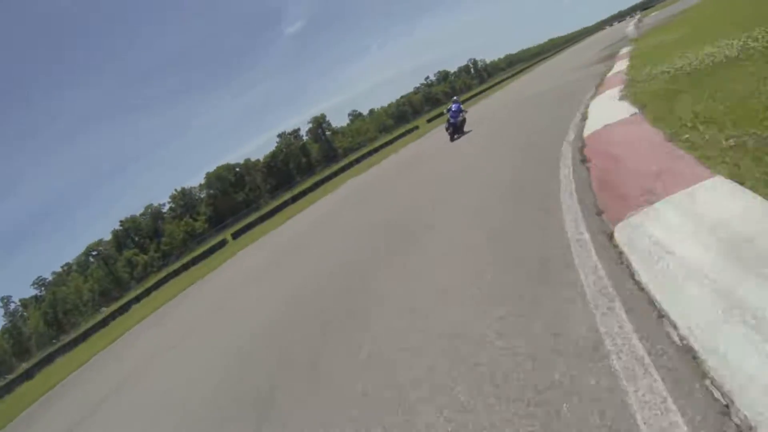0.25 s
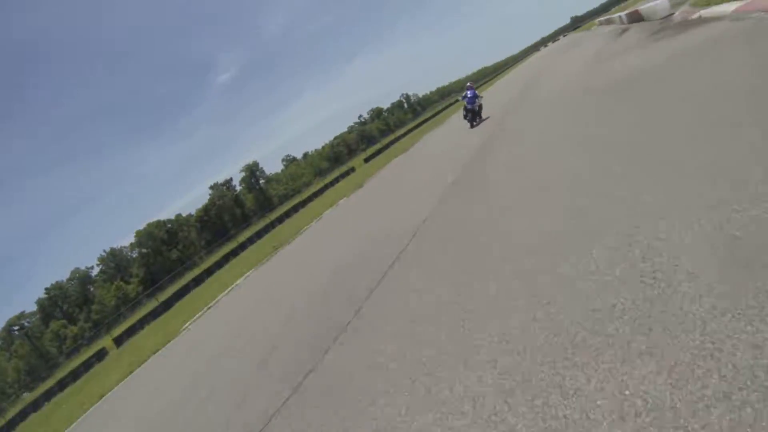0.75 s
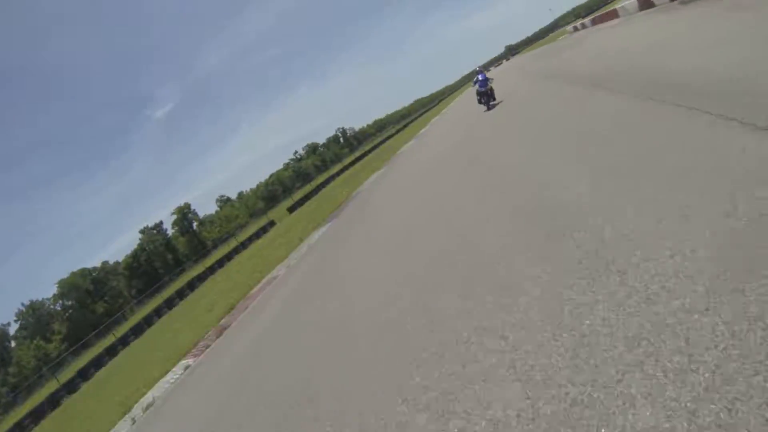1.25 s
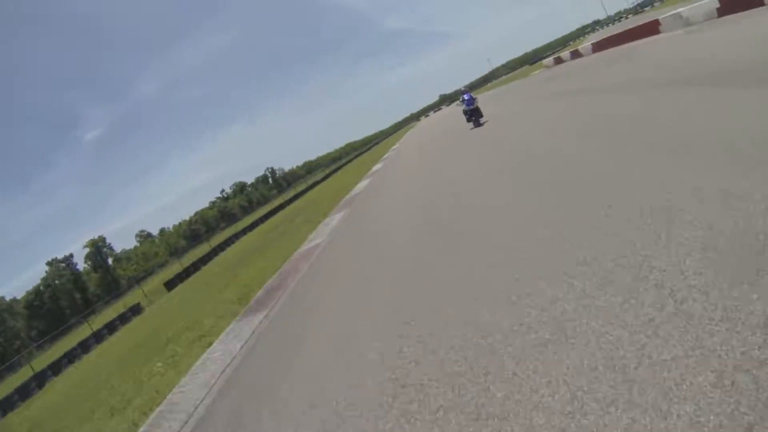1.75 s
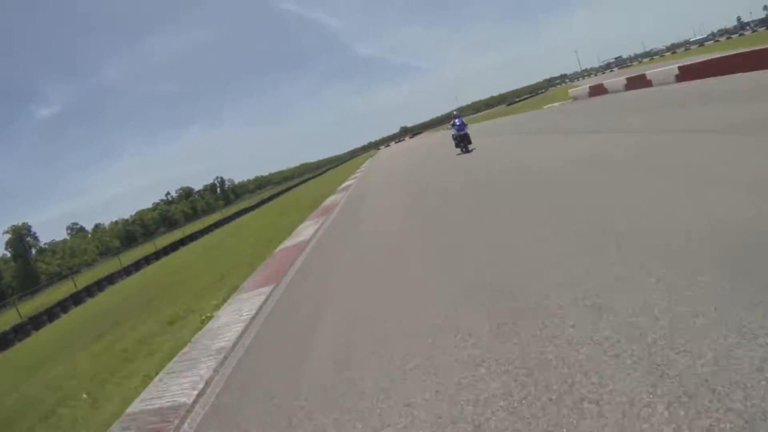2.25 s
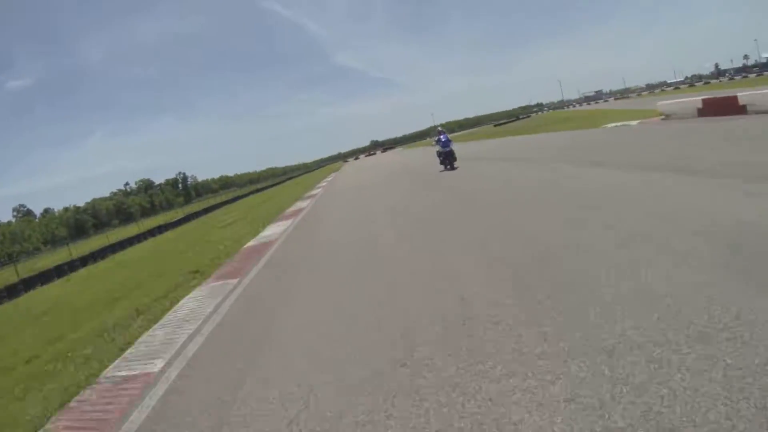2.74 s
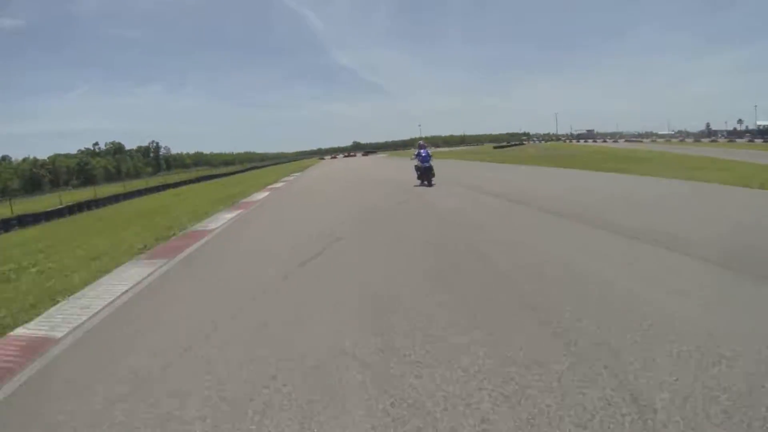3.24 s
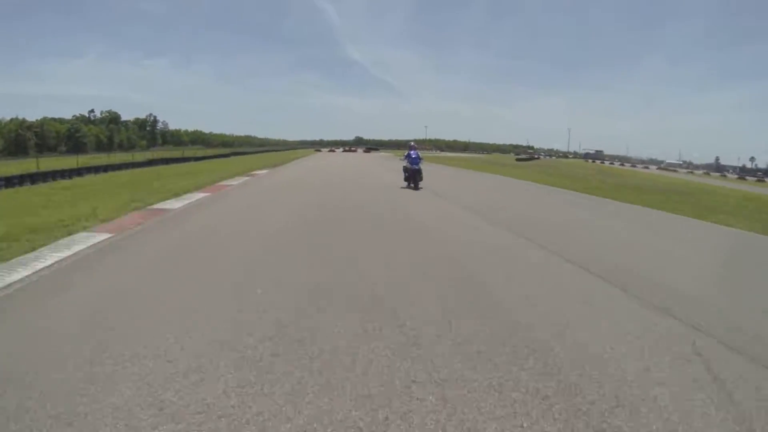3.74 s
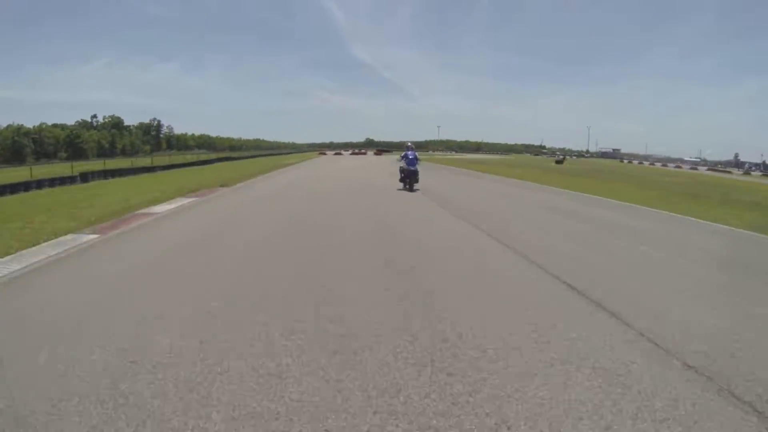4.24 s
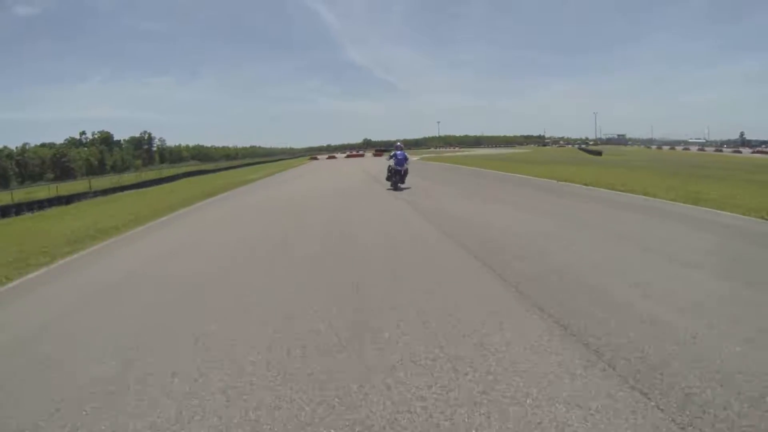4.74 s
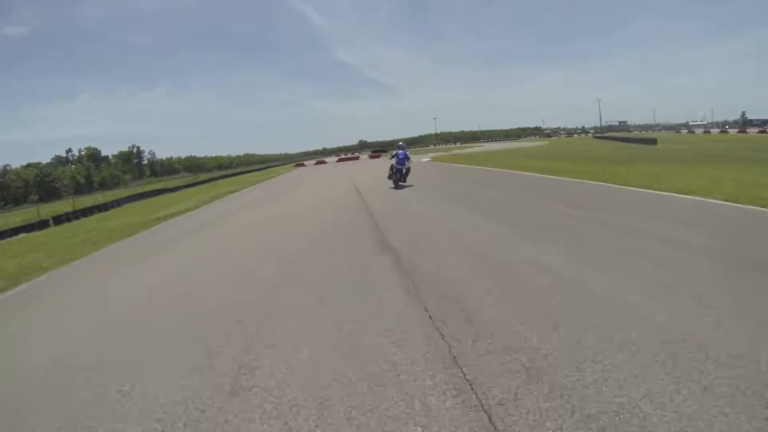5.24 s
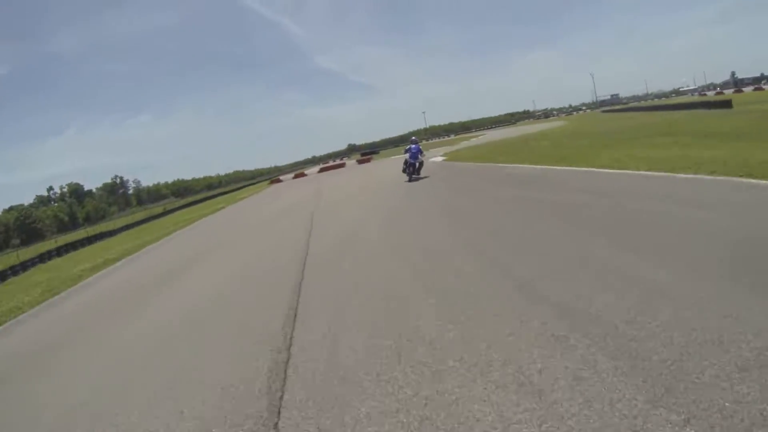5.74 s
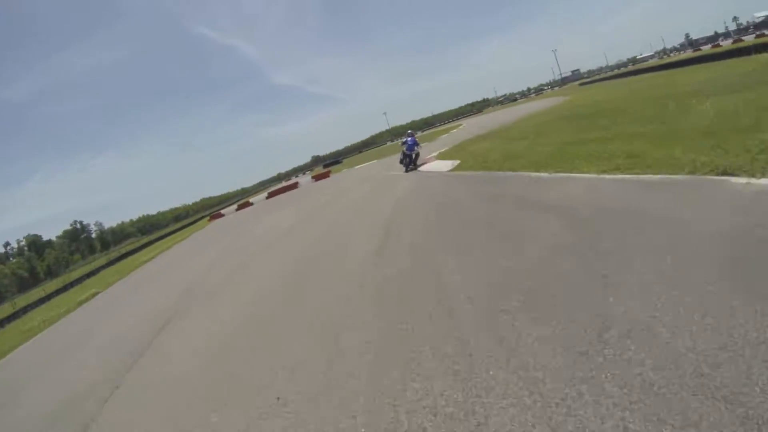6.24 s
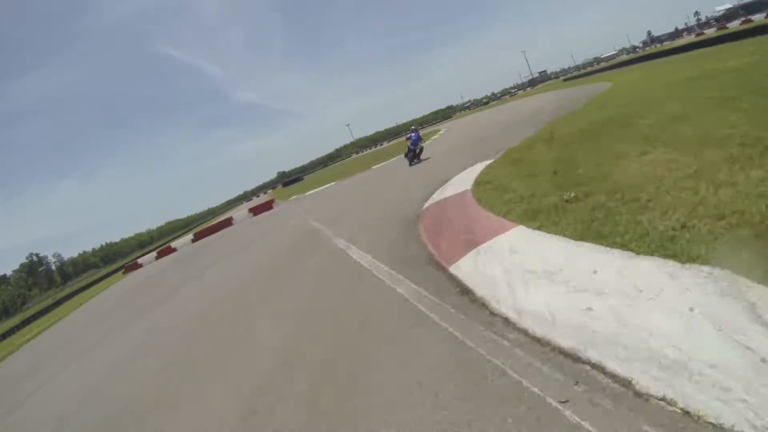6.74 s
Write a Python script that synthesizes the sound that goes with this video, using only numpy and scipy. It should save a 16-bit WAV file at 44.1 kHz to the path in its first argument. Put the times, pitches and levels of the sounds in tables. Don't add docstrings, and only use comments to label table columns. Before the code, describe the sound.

From inside a sealed plastic case mounted on a motorcycle, a low engine drone runs without a break, near 53 turns a second at first, with a harsh buzz above it. From 0.4 s short clusters of dry plastic knocks and bounces chatter over it. Around 1.2 to 1.4 s the mount sways harder and the sound throbs deeply, again near 2 s. The pitch climbs to its highest around 3.6 s as the engine pulls hard, with fewer knocks between 2.5 and 3.3 s. A dense run of ticks comes at 3.8 to 4 s, then a smoother, steady, rattling hum until about 4.8 s. After 5 s the engine eases slightly lower, swaying resumes near 5.4 s, and knocking bouts crowd together, with rattle strongest around 6.3 s, continuing to the cut at 7 s. Muffled, lightly gusting wind stays behind everything.

```python
import sys
import numpy as np
from scipy import signal
from scipy.io import wavfile
from scipy.ndimage import uniform_filter1d

SR = 44100
rng = np.random.default_rng(int(sys.argv[2]) if len(sys.argv) > 2 else 0)


def unload_wav(signal):
    wavfile.write(
        sys.argv[1],
        SR,
        np.round(np.clip(np.atleast_2d(signal).T, -1, 1) * 32767).astype(np.int16),
    )


def boost(x):
    u = np.asarray(x, float) / 20
    return 10 ** u


N = 308259
T = np.arange(N) / SR

# time_s, crank_hz
CRANK_SPEED = [(0.0, 52.58), (0.519, 53.8), (1.03, 56.84), (1.22, 56.71), (1.958, 58.71), (2.764, 61.53),
               (3.628, 62.33), (3.915, 59.66), (3.99, 61.43), (4.593, 59.72), (5.128, 60.08), (5.22, 58.89),
               (5.573, 58.72), (5.877, 57.35), (6.07, 57.97), (6.55, 58.78), (6.693, 57.58), (7.0, 59.31)]
# time_s, load
ENGINE_LOAD = [(0, 0), (.5, 0), (.8, 1), (1.2, 1), (1.5, 2), (2.05, 2), (2.25, 3), (2.7, 3.2), (3.2, 4),
               (3.7, 3.8), (3.9, 2.6), (4.1, 3), (5.12, 3), (5.25, 5), (7, 5)]
# order, level_db at load 0, 1, 2, 3, 4, 5
LOW_ORDERS = [(1, -30.5, -35, -35.5, -36, -37, -34), (2, -40.5, -41.5, -40.5, -38.5, -39, -40),
              (3, -34, -39, -32.5, -28.5, -27.5, -32.5), (4, -36.5, -42.5, -42, -41, -38, -48),
              (5, -43.5, -50.5, -44.5, -50, -49.5, -47.5)]
ORDER_PEAK_TURNS = [.33, -.095, -.085, .085, .03]
# order, level_db at load 0, 1, 2, 3, 4, 5
UPPER_ORDERS = [(5.97, -59.5, -62, -52, -45.5, -44, -48), (7.018, -46.5, -43.5, -38.5, -40, -44, -38),
                (8.016, -51, -44.5, -47.5, -39, -37, -44), (9.06, -43, -54, -52.5, -71.5, -59.5, -45.5),
                (9.95, -46, -56, -48.5, -45, -53, -51), (11.03, -47.5, -56, -60, -52, -58, -62.5),
                (11.94, -54.5, -61.5, -69, -68, -73, -58.5), (14, -55, -54.5, -55.5, -65, -66.5, -57),
                (15, -71, -69, -70.5, -59.5, -67, -58.5), (16, -68, -72, -73, -54.5, -66.5, -66),
                (17, -68, -73.5, -70.5, -57, -50.5, -45), (18, -64, -67, -68, -52, -73.5, -67.5),
                (19, -68, -56.5, -60.5, -58.5, -64.5, -60), (20, -82, -62, -58.5, -55, -64.5, -48.5),
                (21.05, -75, -62, -58, -54.5, -64.5, -57)]
# time_s, sway_db
SWAY_LEVEL = [(0.0, -54.5), (0.41, -30), (0.47, -41), (1.24, -27.5), (1.28, -21.5), (1.38, -23.5),
              (1.65, -34.5), (1.67, -33), (2.06, -27.5), (2.24, -41), (4.83, -41.5), (5.1, -51),
              (5.41, -29.5), (5.7, -32.5), (5.74, -28), (6.19, -39), (6.76, -35), (6.99, -37)]
# time_s, slack_db
CASE_SLACK = [(0, -1.5), (.8, -3), (1.5, 0), (2.1, -1), (2.3, -0.5), (3.2, -4), (3.9, -0.5), (4.02, -6),
              (4.2, 2), (5.3, 2), (5.41, -3.5), (5.5, 1), (6.3, 6), (6.52, 1), (6.65, 3.5), (6.8, 3.5),
              (6.99, 0)]
# mode_hz, width_hz, level_db
BRACKET_MODES = [(227.3, 54.5, 1.5), (204, 170, 3)]
# mode_hz, width_hz, level_db
CASE_MODES = [(414, 8.7, 1.5), (519.8, 48, 6.5), (608, 14, -5), (636, 13, -1.5)]
# mode_hz, width_hz, level_db
RATTLE_MODES = [(806, 170, -12.5), (825, 38.4, -5.5), (950, 228, 4), (1042, 120.5, 6), (1242, 51, -6.5),
                (1487.5, 50, -7.5), (1655, 54, -8), (2090, 280, -2.5)]
# mode_hz, width_hz, level_db
TICK_MODES = [(2070, 300, 5), (2987, 210, 4.5), (3770, 460, 0), (4470, 286, -0.5), (4950, 320, -2.5),
              (6410, 760, 0.5), (8830, 1330, 0.5), (9680, 770, 0), (12900, 1100, -8)]
# first_s, last_s, peak_db, bounce_db
EVERY_TURN_BOUTS = [(.47, .507, -53, -9), (.563, .6, -54, -5), (.728, .746, -56, -2), (.818, .837, -54, -3),
                    (1.296, 1.313, -56, -9), (1.575, 1.592, -53, -9), (1.644, 1.748, -52, -4),
                    (1.868, 1.919, -54, -1), (2.374, 2.391, -54, -1), (2.457, 2.474, -54, -4),
                    (3.367, 3.399, -56, -9), (3.431, 3.463, -53, -3), (3.77, 3.986, -53, -2),
                    (4.897, 4.914, -52, -5), (5.08, 5.147, -52, -3), (5.215, 5.299, -53, -9),
                    (5.333, 5.384, -54, -2), (5.452, 5.571, -52, -6), (5.606, 5.708, -52, -5),
                    (5.829, 5.846, -51, -12), (6.038, 6.089, -53, -12), (6.175, 6.278, -51, -12),
                    (6.313, 6.501, -50, -11), (6.759, 6.81, -52, -9), (6.845, 6.862, -52, -12),
                    (6.93, 6.981, -53, -5)]
# first_s, last_s, peak_db, bounce_db
SECOND_TURN_BOUTS = [(.414, .414, -54, -9), (.637, .673, -54, -4), (.89, .89, -57, -4),
                     (.996, 1.032, -52, -9), (1.137, 1.137, -52, -7), (1.349, 1.349, -53, -4),
                     (1.782, 1.817, -52, -6), (1.953, 2.161, -56, -4), (2.291, 2.324, -55, -3),
                     (2.424, 2.424, -56, -9), (2.638, 2.638, -59, 0), (2.687, 2.687, -57, 3),
                     (2.931, 2.931, -55, -9), (3.012, 3.012, -54, -2), (4.05, 4.116, -57, -12),
                     (4.446, 4.446, -58, -9), (4.83, 4.864, -54, -9), (4.964, 4.964, -52, -9),
                     (5.031, 5.031, -58, -9), (5.181, 5.181, -56, -9), (5.743, 5.743, -55, -1),
                     (5.794, 5.794, -60, -9), (5.882, 5.952, -55, -12), (6.124, 6.124, -54, -12),
                     (6.603, 6.603, -51, -6)]
THIRD_CONTACT_DB = [-3, -3, -2, -11, -11, -3.5]
# freq_hz, level_db_per_hz
WIND_SPECTRUM = [(20, 4.5), (40, -11), (75, -24.5), (250, -14.5), (750, -25.5), (4200, -54.5), (5500, -71),
                 (13000, -80.5)]

BRACKET_DB = [-37.5, -34, -38.5, -42.5, -51.5, -38]
SWAY_HZ, BOUNCE_S = 29.3, 0.0045
THUMP_TURNS, THUMP_JITTER_S = 0.75, 0.0001
KNOCK_TURNS, KNOCK_JITTER_S = 0.95, 0.00028
KNOCK_SPREAD_DB, BOUNCE_SPREAD_DB = 2.2, 3.5
MISSED_DB = -8.5
CASE_LEAD_SAMPLES = 125


def engine(turns):
    hum = np.zeros(N)
    for order, *levels_db in LOW_ORDERS:
        level = boost(by_load(levels_db) + drift(8.3))
        angle = turns - ORDER_PEAK_TURNS[order - 1]
        hum += level * np.sqrt(2) * np.cos(2 * np.pi * order * angle)
    return hum


def buzz(turns, tilt):
    lines = np.zeros(N)
    for order, *levels_db in UPPER_ORDERS:
        level = boost(by_load(levels_db) + 1.2 * drift(20))
        phase_rad = 1.45 + 0.25 * drift(4)
        lines += level * np.sqrt(2) * np.cos(2 * np.pi * round(order) * turns + phase_rad)
    return lines * (1 + 0.36 * tilt)


def mount(turns):
    hard = knocks(turns)
    bout = busy(hard)
    sway_db = curves(SWAY_LEVEL)[0]
    slack_db = curves(CASE_SLACK)[0] + 7.5 * bout
    early = np.roll(hard, -CASE_LEAD_SAMPLES)
    swaying = sway(hard)
    tilt = np.clip(swaying * boost(sway_db + 33), -1, 1)
    faint = boost(-76) * thumps(turns - 0.2, tilt, spread_db=4.5, lean=0.5, bounce=0.9)

    out = boost(sway_db) * swaying
    out += bracket(turns, tilt, hard, sway_db, bout)
    out += buzz(turns, tilt)
    out += case(early, bout)
    out += rattle(turns, tilt, early, slack_db)
    out += boost(1.8) * ticks(hard + faint)
    return out + chatter(turns, tilt, hard, slack_db)


def sway(hard):
    push = rng.standard_normal(N) + boost(86) * np.roll(hard, -570)
    return steadied(ring(push, [(SWAY_HZ, 6.0, 0), (40, 9, -7)]), size=3000)


def bracket(turns, tilt, hard, sway_db, bout):
    blows = thumps(turns, tilt, spread_db=1.0, lean=1.0, bounce=0.51)
    blows = blows + boost(52.5) * hard + boost(-27.0) * rng.standard_normal(N)
    level_db = by_load(BRACKET_DB) + 0.17 * (sway_db + 29.5) + 7.5 * bout
    return boost(level_db) * steadied(ring(soften(blows, 340), BRACKET_MODES))


def case(early, bout):
    blows = boost(41.5) * early + boost(-24.0) * rng.standard_normal(N)
    return boost(-48 + 9.5 * bout) * steadied(ring(soften(blows, 1100), CASE_MODES))


def rattle(turns, tilt, early, slack_db):
    loose = thumps(turns, tilt, spread_db=1.8, lean=0.7, bounce=0.62)
    loose = loose + boost(-30) * shaken(turns, tilt, 0.3) * rng.standard_normal(N)
    blows = soften(soften(loose + boost(41) * early, 1700), 1700)
    return boost(-45 + slack_db) * steadied(ring(blows, RATTLE_MODES), size=3000)


def thumps(turns, tilt, spread_db, lean, bounce):
    at = contacts(turns, THUMP_TURNS, THUMP_JITTER_S)
    luck = rng.standard_normal((len(at), 3))
    out = np.zeros(N + SR)
    for k in range(3):
        blow = bounce ** k * boost(spread_db * luck[:, k])
        out[at + round(k * BOUNCE_S * SR)] = blow * (1 + lean * tilt[at])
    return out[:N]


def knocks(turns):
    at = contacts(turns, KNOCK_TURNS, KNOCK_JITTER_S)
    luck = rng.standard_normal((len(at), 3))
    third_vs_second_db = by_load(THIRD_CONTACT_DB)
    gap = round(BOUNCE_S * SR)
    out = np.zeros(N + SR)
    for every, bouts in enumerate((EVERY_TURN_BOUTS, SECOND_TURN_BOUTS), 1):
        for first_s, last_s, peak_db, bounce_db in bouts:
            first = np.argmin(abs(T[at] - first_s))
            last = np.argmin(abs(T[at] - last_s))
            k = np.arange(first, last + 1, every)
            second_db = np.minimum(bounce_db + BOUNCE_SPREAD_DB * luck[k, 1], 1)
            third_db = second_db + third_vs_second_db[at[k]] + KNOCK_SPREAD_DB * luck[k, 2]
            out[at[k]] = boost(peak_db + KNOCK_SPREAD_DB * luck[k, 0])
            out[at[k] + gap] = boost(peak_db + second_db) * (second_db > MISSED_DB)
            out[at[k] + 2 * gap] = boost(peak_db + third_db) * (third_db > MISSED_DB)
    return out[:N]


def ticks(blows):
    spot = rng.integers(0, 3, N)
    out = np.zeros(N)
    for k, shift in enumerate((0.975, 1, 1.025)):
        modes = [(hz * shift, width_hz, db) for hz, width_hz, db in TICK_MODES]
        out += ring(blows * (spot == k), modes)
    return out


def chatter(turns, tilt, hard, slack_db):
    knock_tail = signal.oaconvolve(hard, np.exp(-T[:1000] / 0.003))[:N]
    gate = shaken(turns, tilt, 0.55) + boost(51) * knock_tail
    modes = [(1790, 203, -2.5), (2950, 380, -10.5), (3700, 920, -6.5), (4130, 470, -15.5),
             (6660, 820, -31.5)]
    hiss = ring(gate * rng.standard_normal(N), modes)
    return boost(-56.0 + 0.52 * slack_db) * steadied(hiss, size=20000)


def wind():
    frames = N // 256 + 5
    bin_hz = np.fft.rfftfreq(1024, 1 / SR)
    real, imag, patches = rng.standard_normal((frames, 513, 3)).T
    patches = evened(uniform_filter1d(uniform_filter1d(patches, 8, 0), 10, 1))
    hz, db = np.transpose(WIND_SPECTRUM)
    level_db = np.interp(np.log(bin_hz + 1), np.log(hz + 1), db)[:, None] + 0.52 * patches
    air = signal.istft((real + 1j * imag) * boost(level_db), nperseg=1024, noverlap=768)[1][:N]
    return boost(-38.5 + 0.69 * drift(18.0)) * evened(air)


def contacts(turns, angle_turns, jitter_s):
    at = np.flatnonzero(np.diff(np.floor(turns - angle_turns)))
    jitter = np.round(jitter_s * SR * rng.standard_normal(len(at))).astype(int)
    return np.clip(at + jitter, 0, N - 1)


def shaken(turns, tilt, rest):
    swell = np.exp(2.0 * (np.cos(2 * np.pi * (turns - 1)) - 1))
    return rest + swell * (1 + 0.6 * tilt)


def busy(hard):
    density = uniform_filter1d(uniform_filter1d(hard, size=1500), size=1500)
    return np.tanh(density * SR / boost(-9.5))


def ring(blows, modes):
    t = T[:6000]
    body = np.zeros(len(t))
    for k, (hz, width_hz, db) in enumerate(modes):
        decay = np.exp(-np.pi * width_hz * t)
        body += (-1) ** k * boost(db) * decay * np.sin(2 * np.pi * hz * t)
    return signal.oaconvolve(blows, body)[:N]


def soften(x, hz):
    return signal.lfilter(*signal.butter(2, hz, fs=SR), x)


def by_load(levels_db):
    return np.interp(curves(ENGINE_LOAD)[0], np.arange(len(levels_db)), levels_db)


def curves(rows):
    time_s, *columns = np.transpose(rows)
    return [np.interp(T, time_s, column) for column in columns]


def drift(top_hz):
    size = int(SR / top_hz)
    return evened(uniform_filter1d(uniform_filter1d(rng.standard_normal(N), size), size))


def evened(x):
    return x / np.sqrt(np.mean(x ** 2) + 1e-20)


def steadied(x, size=6000):
    power = uniform_filter1d(uniform_filter1d(x ** 2, size), size)
    return x / np.sqrt(abs(power) + 1e-20)


def scene():
    turns = np.cumsum(curves(CRANK_SPEED)[0]) / SR
    return (engine(turns) + mount(turns) + wind())[None]


def low_pass(x):
    return signal.sosfilt(signal.butter(12, 14900, fs=SR, output="sos"), x)


def record(dry):
    dulled = signal.sosfilt(signal.butter(6, 13600, fs=SR, output="sos"), dry)
    mix = signal.sosfilt(signal.butter(1, 12, "high", fs=SR, output="sos"), dulled)
    mix = mix * np.minimum((T[-1] - T) / 0.004, 1)
    return low_pass(mix)


dry = scene()
out = record(dry)
unload_wav(out)
```